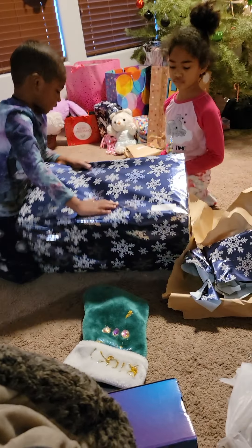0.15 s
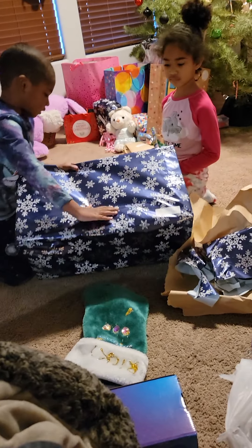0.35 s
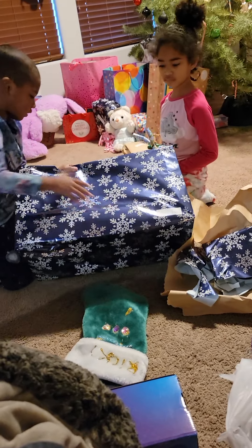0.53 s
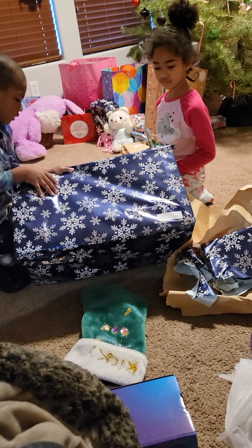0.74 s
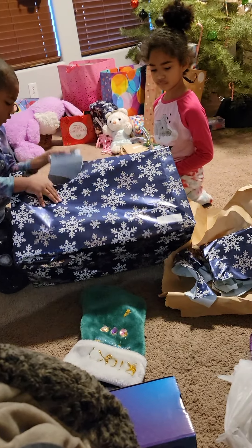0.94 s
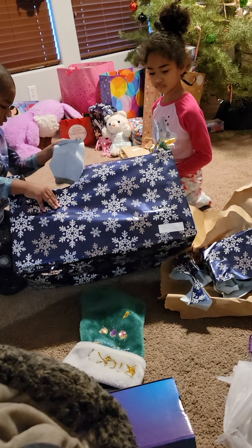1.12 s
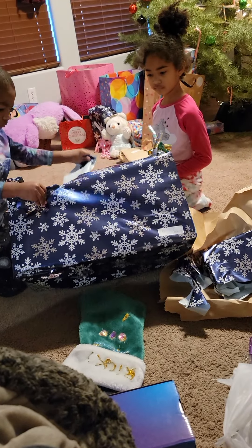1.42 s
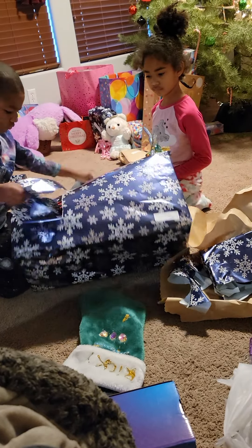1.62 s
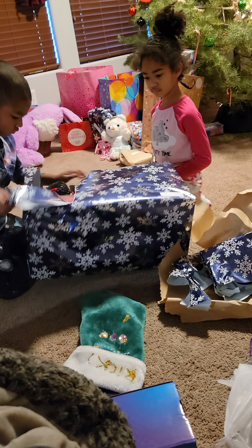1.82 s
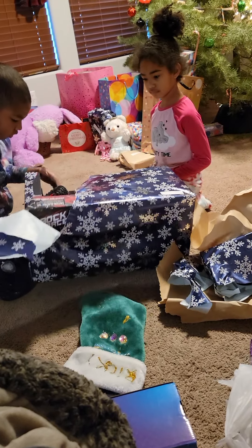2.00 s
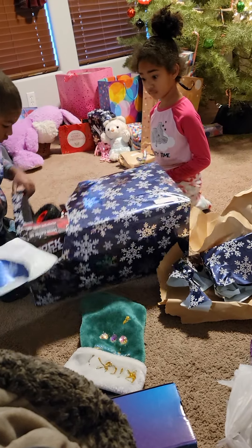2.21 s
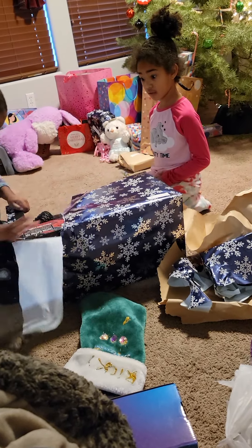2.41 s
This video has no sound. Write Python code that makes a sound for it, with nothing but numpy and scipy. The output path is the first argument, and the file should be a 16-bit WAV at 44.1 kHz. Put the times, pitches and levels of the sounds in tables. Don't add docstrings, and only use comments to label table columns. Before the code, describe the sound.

Wrapping paper crackles and tears on a large cardboard box. From 0 to 0.95 s hands rub and pluck it in uneven crinkles, with a sharp snap near 0.78. A loud, dense rip bursts at 1.0-1.1 s with hollow box thumps; smaller crumples follow, another strong tear at 1.65-1.8, raspy rips around 2.0-2.3, then faint thin ticks. Close stereo, short carpeted room, low household hum.

```python
import sys
import numpy as np
from scipy import signal
from scipy.fft import rfft, irfft
from scipy.io import wavfile
from scipy.ndimage import uniform_filter1d

SR = 44100
rng = np.random.default_rng(int(sys.argv[2]) if len(sys.argv) > 2 else 0)


def nominal_scale(level):
    x = np.asarray(level, float) / 20
    return 10 ** x


def int16_out(signal):
    q = np.round(np.clip(np.atleast_2d(signal).T, -1, 1) * 32767)
    wavfile.write(sys.argv[1], SR, q.astype(np.int16))


N = 112454

RELEASE_S = 0.024
BOX_LAG_S = 0.00087


def rms_one(x):
    return x / np.sqrt(np.mean(x ** 2) + 1e-20)


def butterworth(x, order, hz, kind="low"):
    return signal.sosfilt(signal.butter(order, hz, kind, fs=SR, output="sos"), x)


def at_hz(points, hz):
    points_hz, values = np.transpose(points)
    return np.interp(np.log(hz), np.log(points_hz), values)


def drift(rate_hz):
    r = np.exp(-40 * np.pi * rate_hz / SR)
    noise = rng.standard_normal(N // 20 + 2002)
    slow = signal.lfilter([1], [1, -2 * r, r * r], noise)[2000:]
    return np.interp(np.arange(N) / 20, np.arange(len(slow)), rms_one(slow))


def stroke(start_s, rise_s, hold_s, release_s):
    t = np.arange(N) / SR - start_s
    rise_s, hold_s = max(rise_s, 5e-4), max(hold_s, 0)
    rise = np.clip(t / rise_s, 0, 1) ** 2
    return rise * np.exp(-np.maximum(t - rise_s - hold_s, 0) / release_s)


def clicks(rate_hz, spread_db):
    size = nominal_scale(spread_db * np.minimum(rng.exponential(1, N), 5))
    size = size * rng.choice([-1, 1], N)
    return rms_one(size * (rng.random(N) < rate_hz / SR))


def resonate(x, hz, width_hz):
    r = np.exp(-np.pi * width_hz / SR)
    poles = [1, -2 * r * np.cos(2 * np.pi * hz / SR), r * r]
    return signal.lfilter([(1 - r * r) / 2, 0, (r * r - 1) / 2], poles, x + 1e-18)


def walls(modes, shake):
    def ring(x):
        total = 0
        for k, (hz, width_hz, db) in enumerate(modes):
            total = total + (-1) ** k * nominal_scale(db) * resonate(x, hz, max(width_hz, 10))
        return total

    rough = clicks(2000, 2.5)
    return ring(rough * shake) / np.std(ring(rough))


def spots(x, count):
    place = rng.integers(0, count, N)[(np.arange(N) / SR / 0.006).astype(int)]
    shares = [uniform_filter1d(1. * (place == k), size=64) for k in range(count)]
    return [x * np.sqrt(np.maximum(share, 0)) for share in shares]


def ports(x, lag_s):
    # hz, level_db
    port_balance = [(400, 0.75), (1300, 2.2), (2600, -2.9), (4500, 2.5)]
    hz = np.maximum(np.arange(N // 2 + 1) * SR / N, 1)
    long_wave = 1 / (1 + (hz / 930) ** 4)
    lag = lag_s + (BOX_LAG_S - lag_s) * long_wave
    pan = nominal_scale(at_hz(port_balance, hz))
    return irfft(rfft(x) * np.array([pan, np.exp(-2j * np.pi * hz * lag) / pan]), N)


def effort(bright):
    # start_s, peak_db, rise_s, hold_s, brightness_db
    rub_strokes = [(-.02, -26.5, 0.0057, 0.037, -11), (.021, -21, 0.002, 0.029, -3.5),
                   (.160, -17.5, 0.016, .015, -15.5), (.184, -19, 0.0045, 0.019, -2.5),
                   (.229, -13.5, 0.0053, 0.037, -4), (.289, -19.5, 0.0065, 0.051, -0.5),
                   (.387, -14, 0.0019, 0.0061, -0.5), (.452, -22.5, 0.0037, 0.041, -3.5),
                   (.492, -20, 0.0025, 0.015, 0.5), (.586, -19.5, 0.0015, 0.041, -7),
                   (.738, -23.5, 0.021, 0.027, -1), (.778, -8.5, 0.0025, 0.0099, -3.5),
                   (.842, -24, 0.0092, 0.034, -4.5), (.911, -20, .004, 0.085, -6.5),
                   (.947, -24.5, 0.021, 0.046, 4.5)]
    tear_strokes = [(.992, -8.5, 0.0091, 0.032, -0.5), (1.036, -9.5, 0.008, 0.033, 0),
                    (1.069, -8.5, 0.021, 0.037, 0.5), (1.185, -21.5, 0.0053, 0.038, -7),
                    (1.26, -16, 0.0083, 0.031, -5.5), (1.30, -12.5, 0.016, 0.056, -1),
                    (1.435, -19.5, 0.0064, 0.048, -8), (1.47, -15.5, 0.0041, 0.0058, 0.5),
                    (1.555, -17, 0.0034, 0.074, -2), (1.61, -20, .006, 0.044, -17),
                    (1.66, -9, 0.0064, 0.039, -3.5), (1.708, -9.5, 0.0055, 0.05, -2),
                    (1.735, -17, 0.0092, 0.039, 5), (1.832, -17, 0.0033, 0.1, -5),
                    (1.923, -18, 0.011, 0.13, 2.5), (2.006, -14, 0.0031, 0.06, 0),
                    (2.065, -20, 0.0074, 0.064, 2), (2.166, -22, 0.013, 0.035, -3),
                    (2.205, -17.5, 0.013, 0.018, 0.5), (2.255, -17, 0.0057, 0.013, -6),
                    (2.359, -25, 0.0027, 0.092, -17), (2.475, -22.5, 0.0099, 0.023, -23)]
    power = 1e-12
    for start_s, db, rise_s, hold_s, tilt_db in list(rub_strokes) + list(tear_strokes):
        level = nominal_scale(db - 14 + bright * tilt_db)
        power = power + (level * stroke(start_s, rise_s, hold_s, RELEASE_S)) ** 2
    return np.sqrt(power)


def floor():
    # hz, level_db
    floor_spectrum = [(15, -35), (25, -7), (249, -5.5), (531, -8.5), (695, -17.5), (2410, -11),
                      (3340, -16.5), (6920, -26), (16000, -46)]
    hz = np.maximum(np.arange(N // 2 + 1) * SR / N, 5)
    shape = nominal_scale(at_hz(floor_spectrum, hz)) * (hz > 18)
    noise = irfft(rfft(rng.standard_normal((2, N))) * shape, N)
    return nominal_scale(-44.5 + 4.2 * drift(18.4)) * rms_one(noise)


def room(x):
    t60_s, treble_t60_s, split_hz = 0.21, 0.07, 6800
    out, t = 0, np.arange(SR // 4) / SR
    for part in spots(x, count=4):
        noise = rng.standard_normal((2, len(t)))
        low = butterworth(noise, 1, split_hz)
        tail = low * nominal_scale(-60 * t / t60_s) + (noise - low) * nominal_scale(-60 * t / treble_t60_s)
        tail = tail * np.clip(t / 0.004, 0, 1)
        tail = tail / np.sqrt(np.sum(tail ** 2) / 2)
        out = out + signal.fftconvolve(part[None], tail, axes=1)[:, :N]
    return out


def box(body):
    # start_s, peak_db, length_s, thud_db
    wall_pushes = [(0.0, -35.5, 0.03, 5), (0.05, -47, 0.036, -11), (.105, -45, 0.034, -7),
                   (0.177, -22.5, 0.012, 0), (0.228, -22, 0.011, 1), (0.254, -22.5, .02, -12),
                   (0.316, -32, 0.051, 5), (0.384, -21.5, 0.013, -20), (0.498, -31.5, 0.045, -8),
                   (0.575, -31, 0.033, 0), (0.666, -32.5, 0.014, -21), (.707, -38.5, 0.016, 2),
                   (0.765, -18, 0.0069, -2), (0.857, -33, 0.014, -1), (0.896, -35, 0.024, 1),
                   (0.954, -27.5, 0.036, 0), (1.009, -15, 0.023, -14), (1.026, -13.5, 0.018, -9),
                   (1.073, -16.5, 0.025, 0), (1.16, -31.5, 0.05, -11), (1.27, -25.5, 0.032, -3),
                   (1.316, -28.5, 0.062, 0), (1.464, -25.5, 0.023, -9), (1.585, -22, 0.022, -9),
                   (1.59, -23.5, 0.017, -15), (1.655, -14.5, 0.0054, -2), (1.715, -26.5, 0.072, -5),
                   (1.832, -36, 0.015, 8), (1.912, -48, 0.027, 11), (2.008, -27, 0.036, -1.5),
                   (2.198, -33.5, 0.032, 4), (2.355, -40, 0.024, 3), (2.466, -30.5, 0.014, 7)]
    # pitch_hz, width_hz, level_db
    wall_modes = [(233.5, 33, -3.5), (342, 28.6, 1), (413.3, 18.7, 2.5), (532, 27, 0)]
    # pitch_hz, width_hz, level_db
    thud_modes = [(46.2, 17, -8), (80.6, 39, -4), (112, 26, 2.5), (162.5, 49, -5.5)]
    box_db, thud_trim_db, from_paper_db = -9.5, -6.5, -14
    rise_s, release_s = 0.0011, 0.038
    wall, deep = (nominal_scale(from_paper_db) * body) ** 2, 0
    for start_s, db, length_s, thud_db in wall_pushes:
        push = (nominal_scale(db + box_db) * stroke(start_s - rise_s, rise_s, length_s, release_s)) ** 2
        wall = wall + push
        deep = deep + push * nominal_scale(2 * (thud_db + thud_trim_db))
    return walls(wall_modes, np.sqrt(wall)) + walls(thud_modes, np.sqrt(deep))


def ticks(treble):
    return nominal_scale(-19) * butterworth(clicks(150, 3.6) * treble, 1, 1500, "high")


def rasp():
    # start_s, level_db, hold_s, pitch_hz
    edge_rasps = [(0.013, -37, 0.017, 3670), (0.097, -71, .06, 1980), (0.961, -33, 0.039, 740),
                  (1.012, -36, 0.11, 1760), (0.514, -48, 0.1, 1050), (1.08, -30, 0.038, 1110),
                  (1.735, -34, 0.054, 6540), (2.437, -57, .05, 1840), (1.089, -28, 0.022, 3770),
                  (1.677, -50, 0.032, 830), (1.705, -32.5, .07, 2000), (1.71, -35, 0.096, 4060),
                  (1.998, -28.5, 0.1, 1980), (2.204, -34.5, 0.013, 1620), (2.249, -37.5, 0.016, 2040)]
    width_hz = 650

    def edge(x, hz):
        return resonate(resonate(x, hz, width_hz), hz, width_hz)

    slips = clicks(1200, 2.03)
    out = 0
    for start_s, db, hold_s, hz in edge_rasps:
        force = stroke(start_s, 0.0017, hold_s, RELEASE_S)
        out = out + nominal_scale(db) * edge(slips * force, hz) / np.std(edge(slips, hz))
    return out


def snaps():
    # start_s, peak_db, pitch_hz, crack_db
    crease_snaps = [(.0228, -21, 1770, -10), (0.1873, -19, 1620, -9), (0.2324, -12.5, 1810, 1),
                    (0.39, -5, 2240, -24), (0.4536, -12, 1680, -1.5), (0.4983, -19, 2620, 0),
                    (.5916, -11, 1800, -24), (0.6138, -7, 2230, -17), (0.7457, -13, 1910, -19),
                    (0.7587, -14, 2330, -5), (0.7845, 0, 2200, -10), (0.843, -9.5, 1950, -16),
                    (0.9425, -20, 1880, -10), (1.008, -14.5, 4100, 14), (1.018, 5, 3700, -10),
                    (1.035, 4, 1830, -20), (1.048, 1.5, 2000, -18), (1.0782, 7, 1700, -22),
                    (1.1025, 0, 2200, -16), (.856, -0.5, 3200, -17), (1.279, -9, 1860, -13),
                    (1.44, -11, 1950, -9.5), (1.484, -11, 2620, -3.5), (1.4798, -23, 2430, -5),
                    (1.5645, -10, 2620, 0.5), (1.6154, -6, 1960, -2.5), (1.623, -9, 2400, -3),
                    (1.6701, -2.5, 2220, -2), (1.7115, 1.5, 2270, -17), (1.7545, -1, 2400, -13),
                    (1.784, 1.5, 2100, -18), (2.2168, -5, 2000, -9), (1.962, -6.5, 1930, -6.5),
                    (2.0158, -1, 2300, -23), (2.2114, -6.5, 1960, -12), (2.2687, -5.5, 1850, -11.5),
                    (.965, -25, 5000, -1), (2.33, -27, 6300, -5), (2.3663, -24, 6500, -2.5),
                    (2.408, -26, 6860, -8), (2.435, -26, 6500, -3), (2.498, -26.5, 6000, -3)]
    snap_db, ring_cycles = -7, 8
    crack_trim_db, rag_db, crack_decay_s, crack_rise_s, crack_top_hz = -2.5, 3, 0.0045, 0.001, 12000
    t = np.arange(600) / SR
    out = np.zeros(N + 1000)
    for start_s, db, hz, crack_db in crease_snaps:
        noise, rag = rng.standard_normal((2, len(t)))
        ring = np.sin(2 * np.pi * hz * t) * nominal_scale(-60 * t * hz / ring_cycles)
        ragged = rag_db * np.repeat(rag, 24)[:len(t)]
        crack = nominal_scale(crack_db + crack_trim_db + ragged) * butterworth(noise, 1, crack_top_hz)
        crack = crack * np.exp(-t / crack_decay_s) * np.minimum(t / crack_rise_s, 1)
        first = int(start_s * SR)
        out[first:first + len(t)] += nominal_scale(db + snap_db) * (ring + crack) * np.minimum(t / 0.0003, 1)
    return out[:N]


def paper(body, treble):
    # hz, level_db (per Hz)
    sheet_spectrum = [(450, -19), (800, -4), (1330, -7), (1830, -2.5), (3900, -4), (6500, -10.5),
                      (10200, -13), (13000, -10), (16000, -20)]
    grains_hz, local_grains_hz, spread_db = 2400, 250, 3.3
    local_db, clump_db, clump_hz, pivot_hz = -0.5, 3.5, 120, 2170
    clump = nominal_scale(clump_db * drift(clump_hz))
    broad = clicks(grains_hz * clump, spread_db)
    out, norm = 0, 0
    edges_hz = 450 * 2 ** (np.arange(17) / 3)
    for low, high in zip(edges_hz, edges_hz[1:]):
        hz = np.sqrt(low * high)
        level_db = at_hz(sheet_spectrum, hz)
        share = np.clip(np.log2(hz / pivot_hz) / 2, 0, 1)
        local = clicks(local_grains_hz * hz / 1000 * clump, spread_db)
        force = body ** (1 - share) * treble ** share * nominal_scale(drift(18))
        drive = (broad + nominal_scale(local_db) * local) * force
        out = nominal_scale(level_db) * butterworth(drive, 2, [low, high], "band") - out
        norm += nominal_scale(2 * level_db) * (high - low) * 2 / SR * (1 + nominal_scale(2 * local_db))
    return out / np.sqrt(norm)


def scene():
    body, treble = effort(bright=0), effort(bright=1)
    sheet = paper(body, treble) + rasp() + ticks(treble)
    boom, cracks = box(body), snaps()
    direct = ports(cracks, 0.00004) + ports(boom, BOX_LAG_S)
    for part, lag_s in zip(spots(sheet, count=2), (0.000506, 0.00014)):
        direct = direct + ports(part, lag_s)
    return direct + nominal_scale(-3) * room(sheet + cracks + nominal_scale(-5) * boom) + floor()


def band_limit(x):
    return signal.sosfilt(signal.butter(12, 16980, fs=SR, output="sos"), x)


def record(dry):
    limit = 0.62
    mid, side = dry[0] + dry[1], dry[0] - dry[1]
    side = butterworth(side, 3, 380, "high") + nominal_scale(-19) * side
    pair = butterworth(mid + side * [[1], [-1]], 2, 36, "high") / 2
    rounded = limit * np.tanh(pair / limit)
    mix = signal.sosfilt(signal.cheby2(20, 38, 16050, fs=SR, output="sos"), rounded)
    return band_limit(mix)


dry = scene()
out = record(dry)
int16_out(out)
```